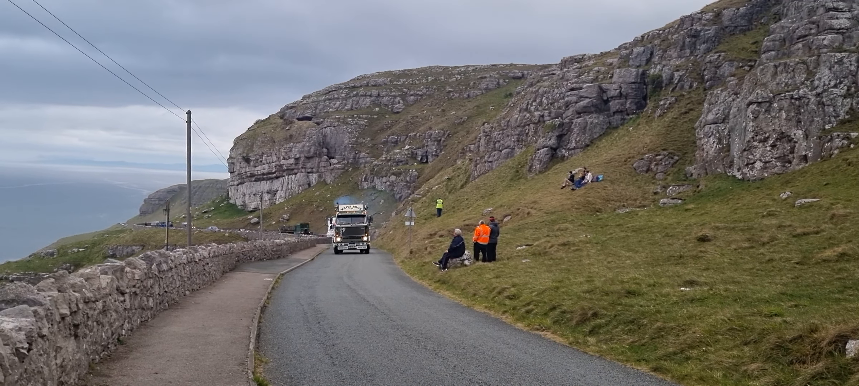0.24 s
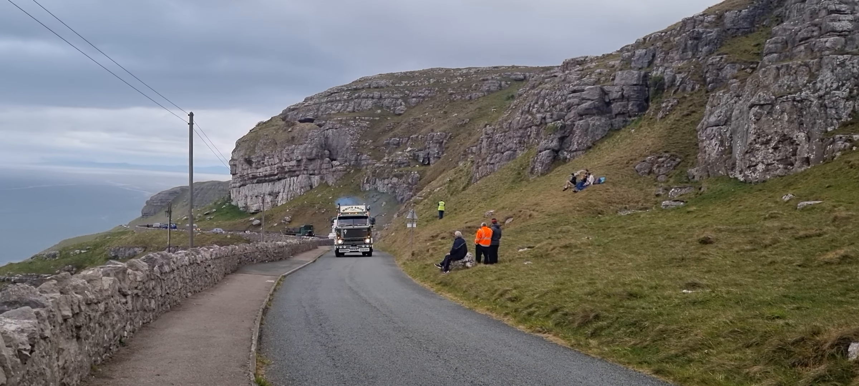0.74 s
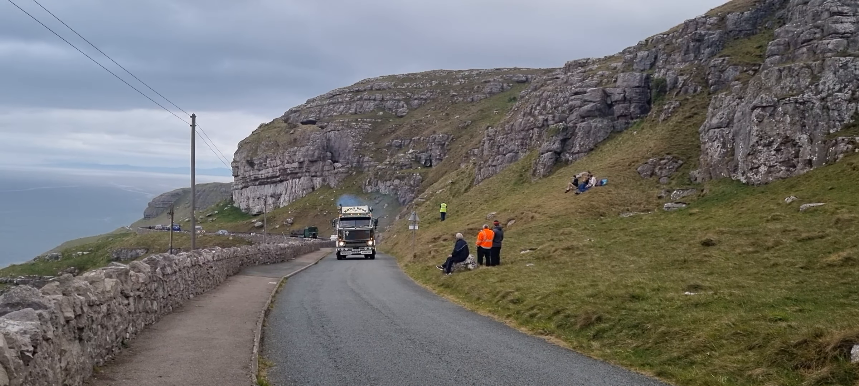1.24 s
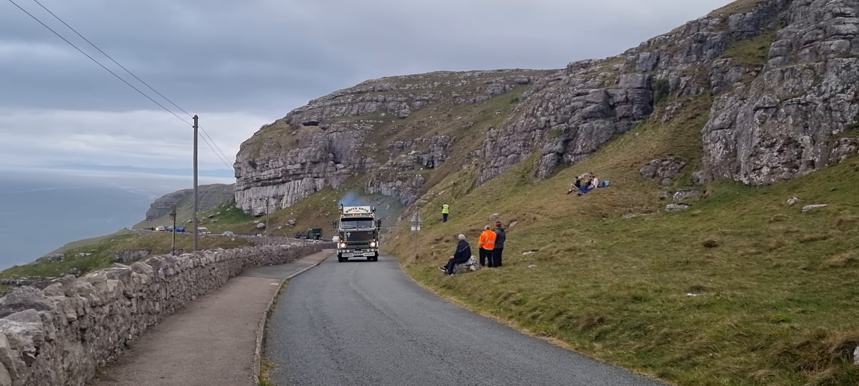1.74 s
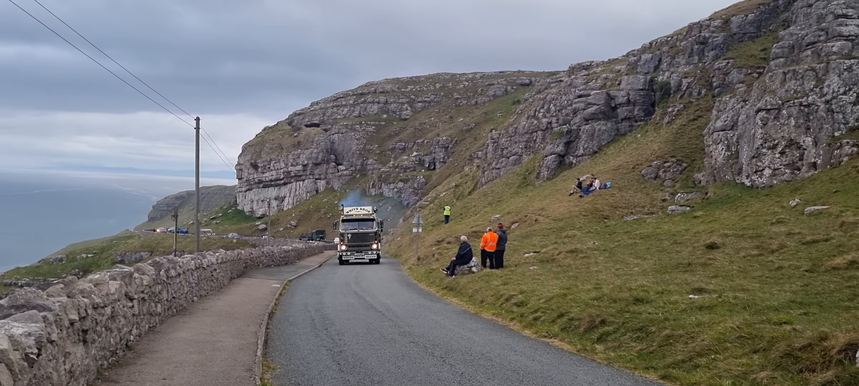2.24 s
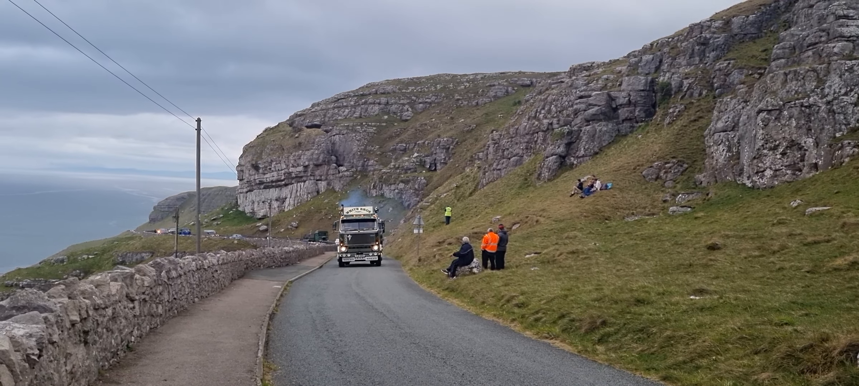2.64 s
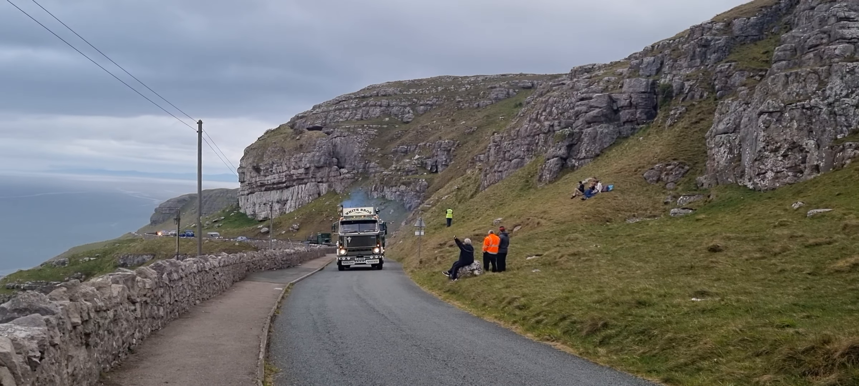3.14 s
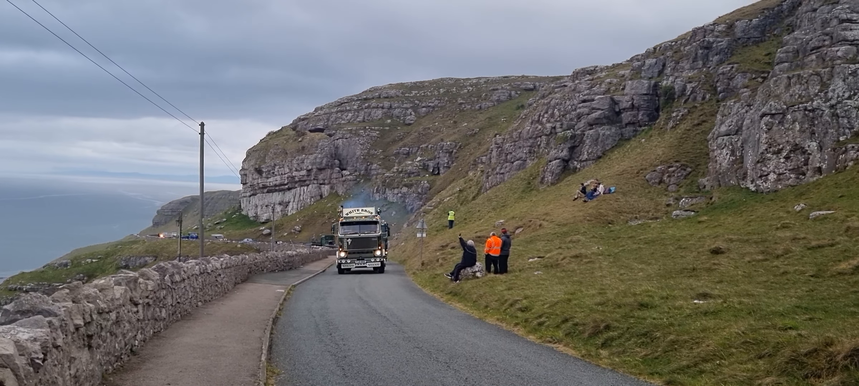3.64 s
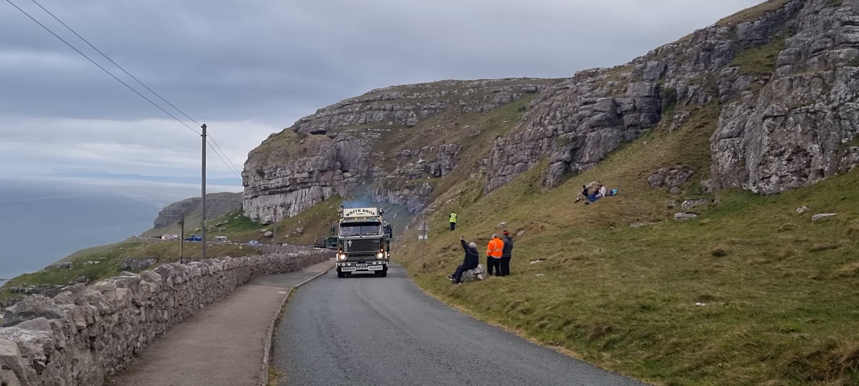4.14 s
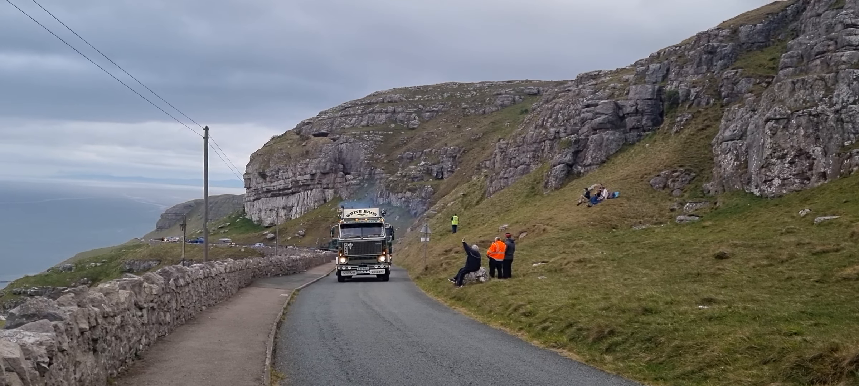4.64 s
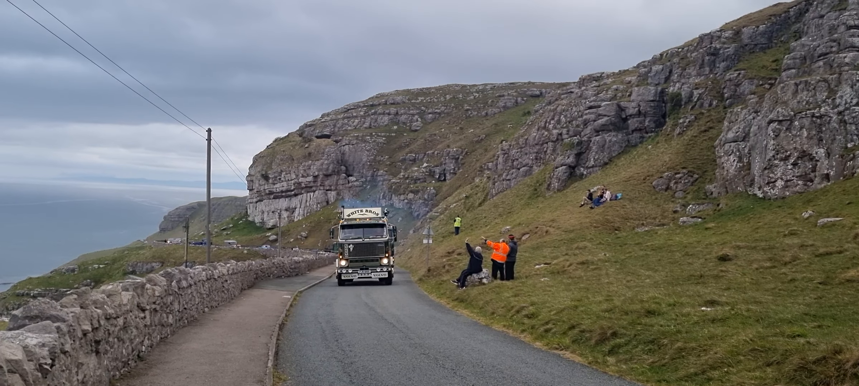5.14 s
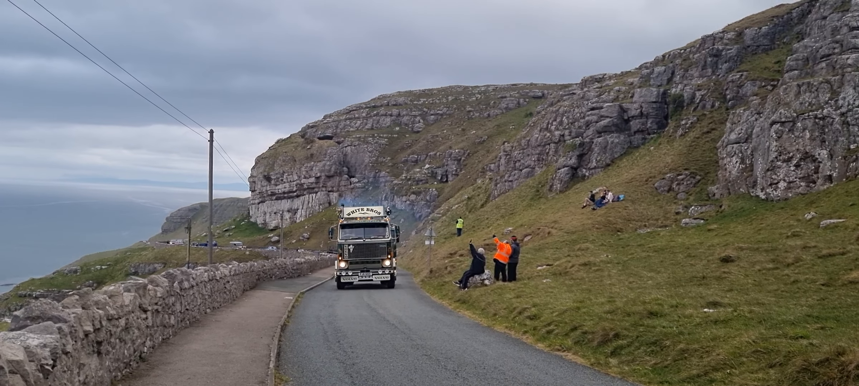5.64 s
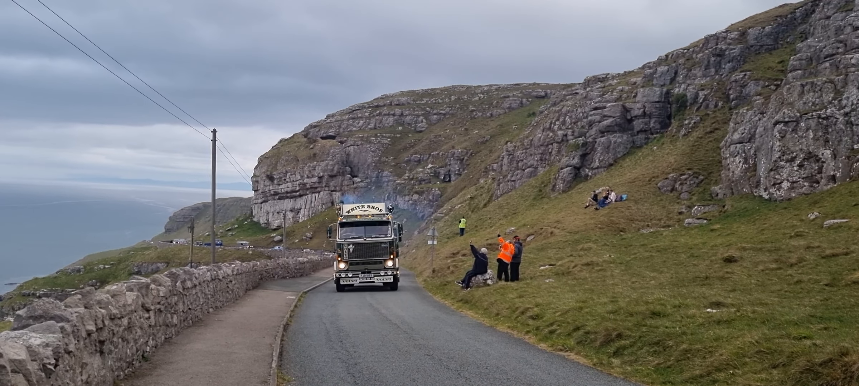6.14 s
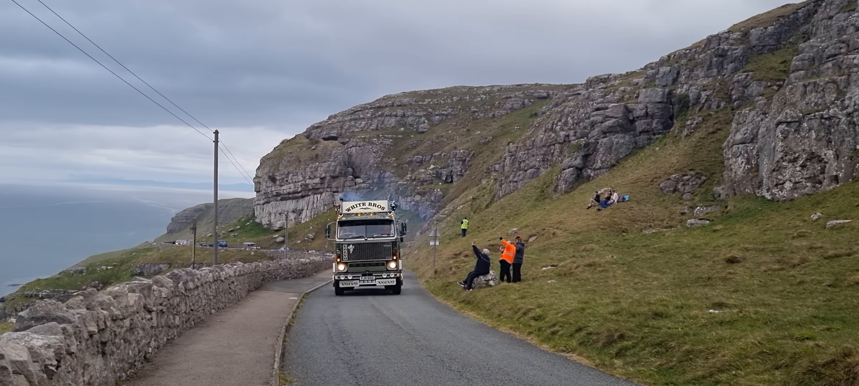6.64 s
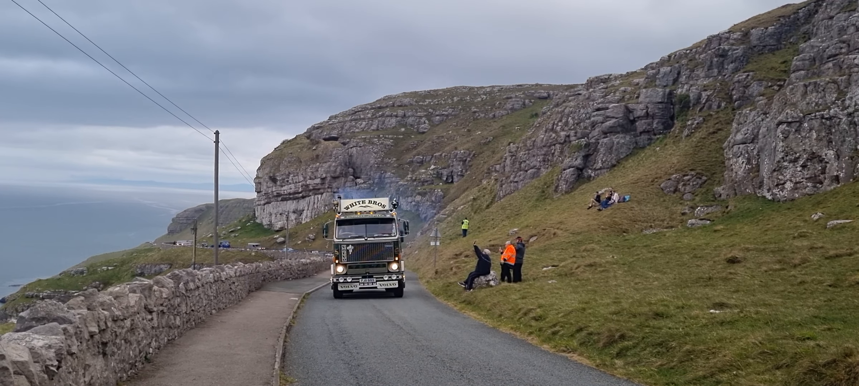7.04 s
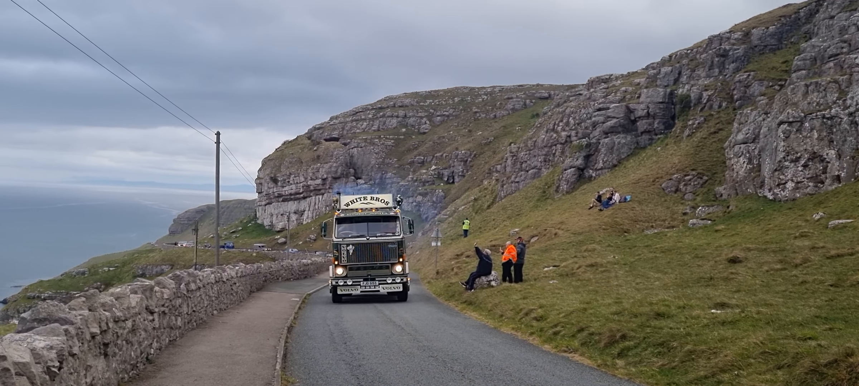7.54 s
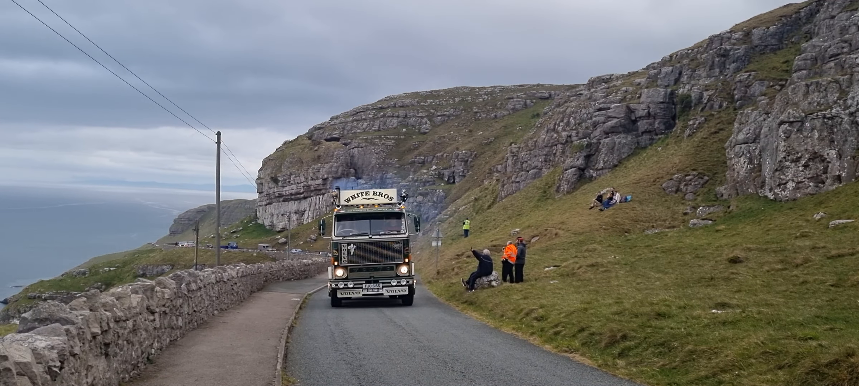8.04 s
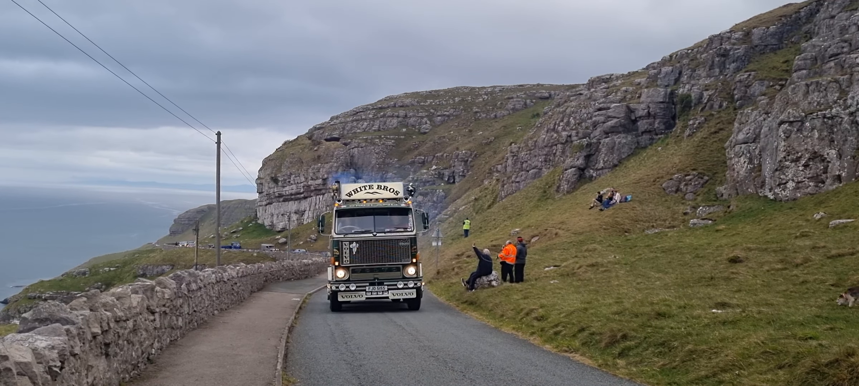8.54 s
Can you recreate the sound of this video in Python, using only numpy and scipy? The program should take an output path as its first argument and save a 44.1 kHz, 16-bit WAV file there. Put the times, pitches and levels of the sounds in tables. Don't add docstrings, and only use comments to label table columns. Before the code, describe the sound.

Steady diesel engine rumble and clatter approach outdoors; a loud sustained truck horn echoes off rock, followed by two quick lower honks.

```python
import sys
import numpy as np
from scipy import signal
from scipy.fft import rfft, irfft, next_fast_len
from scipy.io import wavfile
from scipy.ndimage import uniform_filter1d

SR = 44100
rng = np.random.default_rng(int(sys.argv[2]) if len(sys.argv) > 2 else 0)


def master_out(mix):
    frames = np.transpose(np.atleast_2d(mix))
    ceiling = np.clip(frames, -1, 1)
    pcm = np.round(ceiling * 32767).astype(np.int16)
    wavfile.write(sys.argv[1], SR, pcm)


def volts_from_db(level):
    exponent = np.asarray(level, float) / 20
    return 10 ** exponent


N = 387638


def in_time(rows, t):
    s, *columns = np.transpose(rows)
    return [np.interp(t, s, c) for c in columns]


def at_hz(points, hz, column=1):
    p = np.array(points, float)
    return np.interp(np.log(hz + 1), np.log(p[:, 0] + 1), p[:, column])


def filtered(x, order, hz, kind="low"):
    return signal.sosfilt(signal.butter(order, hz, kind, fs=SR, output="sos"), x)


def rms_one(x):
    return x / np.sqrt(np.mean(x ** 2) + 1e-20)


def drift(rate):
    r = np.exp(-80 * np.pi * rate / SR)
    slow = signal.lfilter([1], [1, -2 * r, r * r], rng.standard_normal(N // 40 + 2002))[2000:]
    return np.interp(np.arange(N) / 40, np.arange(len(slow)), rms_one(slow))


def placed(x, start_s):
    out, at = np.zeros((2, N)), int(start_s * SR)
    out[:, at:at + x.shape[1]] = x
    return out


def port_lead(ports, hz):
    return np.exp(1j * np.interp(hz, *np.transpose(ports)))


# pitch_hz, lead_radians
ROAD_LEAD = [(0, 0.34), (430, 0.87), (690, 2.45), (2840, 2.13), (3450, 8.4), (3880, 1.93), (4220, 9),
             (4910, 10.5), (5770, 10.2), (6890, 11.7), (10200, 21), (10600, 12), (12700, 30), (15500, 23.5)]
# pitch_hz, difference_db
ROAD_TILT = [(60, 0), (110, -0.5), (200, 2.5), (380, -4.5), (700, -1), (1290, 1), (2380, -8.5), (4400, -3),
             (8120, 19), (15000, -5.5)]
# pitch_hz, share (0 to 1)
UNRELATED = [(40, 0.67), (200, 0.23), (700, 0.75), (3000, 0.83), (12000, 0.92)]


def at_ports(source, spectrum):
    size = 2 * next_fast_len(N // 2 + 1)
    hz = np.arange(size // 2 + 1) * SR / size
    direct, diffuse = rfft(source, size) * volts_from_db(at_hz(spectrum, hz)) * (hz < spectrum[-1][0])
    share = np.clip(at_hz(UNRELATED, hz), 0, 1)
    tilt = volts_from_db(at_hz(ROAD_TILT, hz) / 2)
    left = np.sqrt(1 - share ** 2) * direct * port_lead(ROAD_LEAD, hz) + share * diffuse
    out = irfft([left * tilt, direct / tilt], size)[:, :N]
    return out / np.std(out.mean(axis=0))


BLAST_DUCK_DB, TOOT_DUCK_DB, RECOVER_S = -4.5, -0.5, 0.36


def ducking():
    t = np.arange(N) / SR
    spans = [(4.05, 5.0, BLAST_DUCK_DB), (7.47, 7.6, TOOT_DUCK_DB), (7.71, 7.88, TOOT_DUCK_DB)]
    return volts_from_db(sum(db * (t > on) * np.exp(-np.maximum(t - off, 0) / RECOVER_S) for on, off, db in spans))


# time_s, pitch_hz, level_db
DRONE_TONE = [(0.0, 54.76, -28), (0.73, 49.1, -32), (2.5, 49.1, -31), (2.67, 48.1, -37.5),
              (2.94, 47.44, -26.5), (3.72, 56.2, -30), (3.99, 56, -27.5), (4.09, 48.9, -42),
              (4.36, 49.6, -39), (4.48, 57.1, -57), (4.77, 51.1, -49), (5.53, 57.33, -27.5),
              (6.41, 62.15, -40.5), (7.2, 57.5, -48), (7.32, 58, -32), (7.54, 50.9, -57),
              (7.91, 50.25, -41), (8.79, 57.2, -32)]
# pitch_hz, level_db (per Hz)
RUMBLE_COLOUR = [(18, -37.5), (30, -12.5), (40, -4.5), (52, -7), (75, -3), (91, -3), (105, -17), (119, -18),
                 (135, -15), (180, -45), (300, -120)]
RUMBLE_DB, RUMBLE_FADE_DB, RUMBLE_FADE_S = -41.5, 12, 2.97


def drone():
    t = np.arange(N) / SR
    pitch_hz, tone_db = in_time(DRONE_TONE, t)
    cycles = np.cumsum(pitch_hz + 0.73 * drift(3.1)) / SR
    tone = np.sin(2 * np.pi * cycles) * volts_from_db(tone_db + 2.5 + 1.7 * drift(9.4))
    rumble_db = RUMBLE_DB + RUMBLE_FADE_DB * np.exp(-t / RUMBLE_FADE_S) + 1.6 * drift(4.5)
    rumble = at_ports(rng.standard_normal((2, N)), RUMBLE_COLOUR)
    return tone + volts_from_db(rumble_db + 3) * ducking() ** 0.53 * rumble


# time_s, level_db
EFFORT = [
    (0, 0.2),
    (1.5, -.5),
    (3, 0.94),
    (4, 2),
    (5.25, -2),
    (6, -2.5),
    (7, 1),
    (7.4, 3),
    (8, 5),
    (8.79, 4.5),
]
# time_s, share of the usual cycle rate
ENGINE_SPEED = [(0, .97), (1.2, .985), (3.8, 1.0), (5.4, 1.0), (7.9, 1.0), (8.4, .995), (8.79, .97)]
# multiple_of_cycle, level_db
FIRING_TONES = [(6, -10.5), (12, 2), (18, -2), (20, -5), (32, -16.5), (42, -12), (63, -32.5), (88, -23.5),
                (120, -17)]
# pitch_hz, level_db (per Hz)
ROAR_COLOUR = [(74, -29), (125, -1), (145, -17), (156, -7), (178, -3.5), (221, -10), (303, -14), (370, -16),
               (409, -11), (620, -17.5), (810, -54), (1360, -120)]
CLATTER_COLOUR = [(340, -11), (580, -10.5), (628, -5.5), (680, -11), (837, 0.5), (933, -5.5), (1150, 1),
                  (1310, -7), (1710, -9.5), (2020, -15.5), (3220, -15), (3930, -24.5), (4610, -31.5),
                  (5030, -31), (6200, -47), (8060, -53), (13600, -120)]
HISS_COLOUR = [(3410, -40.5), (5800, -5), (6330, -17), (7740, -15), (9120, -28), (10000, -2.5), (11200, -2),
               (12000, 6), (14100, 0.5), (15100, -6), (15800, -7)]
CYCLE_HZ, TICK_S = 9.715, 5.389
ROAR_DB, CLATTER_DB, HISS_DB, TONES_DB = -40.5, -43.5, -86, -39
ROAR_FOLLOWS, HISS_FOLLOWS, TONES_FOLLOWS = 0.71, .9, 0.79
LEAVING_S, LEAVING_ROAR_DB, LEAVING_CLATTER_DB, LEAVING_HISS_DB = 0.94, 7, 1.5, 9
EMERGE_S, HIDDEN_DB = 1.97, -8
CLEAR_S, CLEAR_HISS_DB = (4.7, 6.44), 12.5
TONE_WAVER_DB = 1.3


def lorry():
    t = np.arange(N) / SR
    effort_db, = in_time(EFFORT, t)
    leaving = np.exp(-t / LEAVING_S)
    clearing_db = np.interp(t, CLEAR_S, (0, CLEAR_HISS_DB))
    roar_db = ROAR_DB + ROAR_FOLLOWS * effort_db + LEAVING_ROAR_DB * leaving
    clatter_db = CLATTER_DB + effort_db + LEAVING_CLATTER_DB * leaving
    hiss_db = HISS_DB + HISS_FOLLOWS * effort_db + LEAVING_HISS_DB * leaving + clearing_db
    tone_db = TONES_DB + TONES_FOLLOWS * effort_db + HIDDEN_DB * np.exp(-t / EMERGE_S)

    cycle = np.cumsum(in_time(ENGINE_SPEED, t)[0]) * CYCLE_HZ / SR
    cycle -= np.interp(TICK_S, t, cycle)
    firing = 1 + 0.13 * np.cos(12 * np.pi * cycle) + 0.022 * np.cos(4 * np.pi * cycle)
    tick = 1 + 1.1 * volts_from_db(3 * drift(4)) * np.exp(-(cycle % 1) / 0.086) * (t > 5)

    noise = rng.standard_normal((3, 2, N))
    roar = volts_from_db(roar_db - 0.5 + 1.6 * drift(2.9)) * at_ports(noise[0] * firing, ROAR_COLOUR)
    clatter = volts_from_db(clatter_db + 0.81 * drift(6.6)) * at_ports(noise[1] * firing, CLATTER_COLOUR)
    hiss = volts_from_db(hiss_db + 1.1 * drift(20)) * at_ports(noise[2] * firing * tick, HISS_COLOUR)
    wobble = cycle + 0.0013 * drift(0.7)
    tones = np.zeros(N)
    for k, db in FIRING_TONES:
        tones += volts_from_db(db + TONE_WAVER_DB * drift(0.86)) * np.sin(2 * np.pi * k * wobble + k)
    return roar + clatter + hiss + volts_from_db(tone_db + 2.0) * tones


# time_s, peak_db
GRIT_CLICKS = [(0.2573, -60), (0.4923, -58), (0.8294, -57), (1.955, -65), (2.4997, -68), (2.9476, -63),
               (3.2261, -68.5), (3.7249, -64)]
# time_s, peak_db
PANEL_KNOCKS = [
    (1.952, -22),
    (8.386, -19),
    (8.495, -21),
    (8.595, -17),
]


def grit():
    out, t = np.zeros((2, 2, N)), np.arange(800) / SR
    for layer, events, decay_s in zip(out, (GRIT_CLICKS, PANEL_KNOCKS), (.002, .005)):
        for s, db in events:
            at = int(s * SR)
            layer[:, at:at + 800] += volts_from_db(db) * rng.standard_normal((2, 800)) * np.exp(-t / decay_s)
    clicks = filtered(out[0], 2, 4000, "high")
    knocks = filtered(out[1], 3, [800, 1900], "band")
    return clicks + 0.6 * knocks


def scatter(db, t60, rise_s):
    t = np.arange(SR) / SR
    reply = rng.standard_normal((2, SR)) * volts_from_db(-60 * t / t60) * np.clip(t / rise_s, 0, 1)
    return reply * volts_from_db(db) / np.sqrt(np.sum(reply[0] ** 2))


# delay_s, level_db
ROCK_ECHOES = [
    (.045, -24.5),
    (.085, -23),
    (.16, -23.5),
]
TAIL_DB, TAIL_T60_S, ECHO_CUT_HZ = -23, 1.6, 1200
NEAR_DB, NEAR_T60_S, NEAR_CUT_HZ = -18.5, 0.46, 4700
ECHO_LOW_HZ = 221


def rock_face(x):
    reply = scatter(TAIL_DB, TAIL_T60_S, rise_s=0.037)
    for delay, db in ROCK_ECHOES:
        reply[:, int(delay * SR)] += volts_from_db(db)
    reply = filtered(reply, 3, ECHO_CUT_HZ)
    reply += filtered(scatter(NEAR_DB, NEAR_T60_S, rise_s=0.0036), 2, NEAR_CUT_HZ)
    reply = filtered(reply, 1, ECHO_LOW_HZ, "high")
    start = 4 * SR
    return placed(signal.fftconvolve(x[:, start:], reply, axes=1)[:, :N - start], 4)


WARM_DULL_DB, WARM_S = 0.06, 0.025
RING_ONSET_S = 0.013


def valve(t, opens, shut, attack_s, free_s, free_dull_db, bloom_s, surge_db, settle_s, start_sharp,
          hold_dull_db, close_s, close_db, close_dull_db, end_sharp, ring_dull_db, ring_db_per_s):
    beating = np.maximum(t - opens - free_s, 0)
    after = np.maximum(t - shut, 0)
    closing = np.clip(1 + (t - shut) / close_s, 0, 1)
    settling = np.exp(-beating / settle_s)
    ringing = 1 - np.exp(-after / RING_ONSET_S)
    level_db = surge_db * settling - close_db * closing ** 2 - ring_db_per_s * after
    gain = np.clip((t - opens) / attack_s, 0, 1) * volts_from_db(level_db)
    sharp = start_sharp * settling + end_sharp * closing ** 2 * (1 - 0.74 * ringing)
    dull_db = hold_dull_db + WARM_DULL_DB * np.exp(-beating / WARM_S)
    dull_db = dull_db + free_dull_db * np.exp(-beating / bloom_s)
    dull_db = dull_db + close_dull_db * closing + ring_dull_db * ringing
    return gain, sharp, dull_db


PUFF_DB, PUFF_S, PUFF_LEAD_S, PUFF_CUT_HZ = 6.5, 0.018, .001, (1400, 6800)


def puff(t, opens):
    since = t - opens + PUFF_LEAD_S
    hiss = filtered(rng.standard_normal(len(t)), 1, PUFF_CUT_HZ, "band")
    return volts_from_db(PUFF_DB) * np.clip(since / .002, 0, 1) * np.exp(-np.maximum(since, 0) / PUFF_S) * hiss


SHIMMER_DB, SHIMMER_PER_S = 5.5, 6.1


def wander_gain(spread):
    return (1 + SHIMMER_DB * spread * np.log(10) / 40) ** 2


BREATH_DB, BREATH_GATE, BREATH_CUT_HZ = -17, 0.6, 3000


def reed(cycles, dull_db, count):
    dull_db = np.maximum(dull_db, 0)
    turn = np.exp(2j * np.pi * cycles)
    partial, out = turn.copy(), np.zeros(len(cycles))
    step = turn * volts_from_db(-dull_db)
    knots = np.arange(len(cycles)) / SR * SHIMMER_PER_S
    eddies = rng.standard_normal((count, 20))
    for k in range(count):
        if k % 3 == 0:
            wander = wander_gain(np.interp(knots, np.arange(20), eddies[k] * k / count))
        out -= wander * partial.real
        partial = partial * step
    breath = rng.standard_normal(len(cycles)) * (1 - BREATH_GATE * turn.real)
    breath = filtered(breath, 1, BREATH_CUT_HZ, "high")
    return out + volts_from_db(BREATH_DB - 7.0 * dull_db) * np.sqrt(count) * breath


def causal_phase(db):
    cepstrum = irfft(db * np.log(10) / 20)
    half = len(cepstrum) // 2
    cepstrum[1:half] *= 2
    cepstrum[half + 1:] = 0
    return rfft(cepstrum).imag


def bell(pulses, table, pitch_hz, columns, ports, causal=1, lead=((1, 0, 0),)):
    size = 2 * next_fast_len(len(pulses) // 2 + 4096)
    order = np.arange(size // 2 + 1) * SR / size / pitch_hz
    left_db, right_db = (at_hz(table, order, column=c) - 30 * np.clip(1 - order, 0, 1) for c in columns)
    body = causal * causal_phase(at_hz(table, order, column=2))
    rows = 2.56 * rng.standard_normal((2, 200)) * (np.arange(200) > 40)
    uneven_db = [np.interp(order, np.arange(200), row) for row in rows]
    left = volts_from_db(left_db + uneven_db[0]) * port_lead(ports, order * pitch_hz)
    left = left * np.exp(1j * at_hz(lead, order))
    right = volts_from_db(right_db + uneven_db[1]) * np.exp(1j * at_hz(lead, order, column=2))
    return irfft(rfft(pulses, size) * np.exp(1j * body) * [left, right], size)[:, :len(pulses)]


FOURTH_BELOW_DB = 7


def deep_reed(cycles, dull_db, third_db):
    third = (volts_from_db(third_db) - 1) * np.cos(6 * np.pi * cycles)
    fourth = (volts_from_db(third_db - FOURTH_BELOW_DB) - 1) * np.cos(8 * np.pi * cycles)
    plain = reed(cycles, dull_db, count=126)
    return plain, plain - .9 * (third + fourth) * volts_from_db(1.2 - dull_db)


# multiple_of_pitch, left_db, right_db
DEEP_COLOUR = [(1.001, -27, -28), (2, -36, -40), (3, -31.5, -32), (4.02, -31.5, -29), (5, -31, -26),
               (6, -23.5, -31), (7, -30, -46), (7.9, -28, -28), (9.1, -25.5, -23), (10, -21.5, -23.5),
               (10.9, -21.5, -25), (11.8, -26, -35), (13.4, -30, -24.5), (13.8, -45, -32),
               (15.3, -34, -24.5), (16, -36, -30), (17.2, -44, -30.5), (18, -32, -28), (19, -40, -31),
               (20.1, -37, -38), (21, -33, -38), (22.4, -33, -31), (23, -33, -38), (23.5, -40, -29),
               (24.8, -40, -26.5), (26, -33, -24.5), (27.3, -45, -23.5), (28, -39, -32), (29.3, -40, -32),
               (30.2, -41, -37), (31, -50, -48), (31.8, -44, -39), (33, -46, -40), (34, -40, -44),
               (34.6, -48, -42), (36, -41, -38), (36.8, -45, -43), (38, -44, -48), (39, -41, -47),
               (40, -41, -47),
               (41.7, -39, -45), (54.7, -47.5, -68.5), (69.5, -51, -73), (82.6, -49.5, -62),
                   (97, -46, -42), (116, -48, -54)]
# pitch_hz, lead_radians
DEEP_LEAD = [(0, -1), (123, 0.44), (246, 0.35), (369, 0.74), (492, 1), (615, 2.1), (738, 3.5), (861, 1),
             (984, 1.2), (1107, 1.86), (1230, 2.14), (1353, 1.8), (1476, 1.4), (1599, 2.1), (1722, 1),
             (1845, 4), (1968, 1.5), (2091, 4), (2214, 3), (2337, 5.5), (2460, 6.5), (2583, 3.5),
             (2706, 2.3), (2829, 3.5), (2952, 4), (3075, 4.75), (3198, 4), (3321, 1.5), (3444, 6.5),
             (3567, 7.72), (3690, 8), (3813, 13), (3936, 7.5), (5340, 16), (6370, 17.5), (7490, 44.5),
             (9040, 46.6), (9990, 55.5), (11300, 60), (12700, 50.1), (15500, 56)]
DEEP_REED = dict(attack_s=.01, free_s=0.0092, free_dull_db=2.4, bloom_s=0.0047, surge_db=-4.5,
                 settle_s=0.035, start_sharp=0.85, hold_dull_db=0.36, close_s=0.017, close_db=4,
                 close_dull_db=0, end_sharp=2.77, ring_dull_db=0.3, ring_db_per_s=330)
TOOT_HZ, PARTNER_DB, TOOT_PUFF_DB = 122.9, -2.2, -18
LAG_CYCLES_PER_S, PARTNER_PORT_CYCLES, CATCH_UP_CYCLES = 0.32, 0.0058, 0.036
WALL_S, WALL_HZ, WALL_DB = .062, (407, 556), -3
DEEP_CAUSAL = .95


def toot(opens, shut, level_db, lag, third_db):
    t = opens - .02 + np.arange(int(.33 * SR)) / SR
    gain, sharp, dull_db = valve(t, opens, shut, **DEEP_REED)
    cycles = TOOT_HZ * np.cumsum(1 + sharp / 100) / SR
    gain = gain * volts_from_db(level_db + 2)
    plain, shaped = gain * deep_reed(cycles, dull_db, third_db)
    first = shaped + volts_from_db(TOOT_PUFF_DB) * puff(t, opens - .008)
    catch_up = np.interp(t - shut, (-.022, -.006), (0, CATCH_UP_CYCLES))
    behind = lag + LAG_CYCLES_PER_S * (t - opens) - catch_up
    partner = gain * volts_from_db(PARTNER_DB) * deep_reed(cycles - behind, dull_db, third_db)[1]
    wall = np.roll(filtered(plain, 2, WALL_HZ, "band"), int(WALL_S * SR))

    colour = DEEP_COLOUR
    out = bell(first + volts_from_db(WALL_DB) * wall, colour, TOOT_HZ, (1, 2), DEEP_LEAD, DEEP_CAUSAL)
    across = [(hz, lead - 2 * np.pi * hz / TOOT_HZ * PARTNER_PORT_CYCLES) for hz, lead in DEEP_LEAD]
    return placed(-out - bell(partner, colour, TOOT_HZ, (1, 2), across, DEEP_CAUSAL), t[0])


# opens_s, shut_s, level_db, partner_lag_cycles, third_partial_db
TWO_TOOTS = [
    (7.448, 7.586, 2, 0.069, 8.5),
    (7.696, 7.877, 2, 0.08, 0.5),
]


def toots():
    return sum(toot(*row) for row in TWO_TOOTS)


# multiple_of_pitch, first_left_db, first_right_db,
# second_left_db, second_right_db
BLAST_COLOUR = [(1, -19.5, -20, -20, -20.5), (2, -17, -15.5, -24.5, -23.5), (2.99, -37.5, -34, -37, -32.5),
                (4, -36, -33.5, -44.5, -39), (5.02, -33.5, -38, -28, -30.5), (6.09, -20.5, -21, -23.5, -25),
                (7, -18, -22.5, -23, -23), (7.97, -19, -23.5, -24, -28.5), (9.1, -20, -23, -26.5, -28.0),
                (10.1, -23.5, -17.0, -23.5, -21.5), (10.92, -19, -15.5, -31.5, -24.5),
                (11.9, -36.5, -27.5, -45.5, -35), (12.4, -27.5, -25.5, -33.5, -22.5),
                (13.87, -29.5, -35.5, -31.5, -26.5), (14.8, -27, -33, -28, -39),
                (16.4, -40.5, -23, -36.5, -30.5), (17.5, -28, -27.5, -34, -26),
                (18.04, -34, -21.5, -45.5, -27), (18.87, -37, -19.5, -46, -26.5),
                (20.1, -47, -33, -42, -37.5), (21, -31.5, -26.5, -37.5, -29),
                (22, -39, -27.5, -46.5, -36.5), (22.8, -43.5, -44, -37, -29), (24.14, -33, -41, -39, -45),
                (25.3, -32, -29, -31.5, -35.5), (26, -32.5, -31.5, -34.5, -33.5),
                (26.4, -39, -38, -41, -47.0), (28, -39.5, -39, -43.5, -40), (28.7, -43, -35.5, -39, -42.5),
                (29.3, -46.5, -43, -44.5, -41.5), (31, -44, -43, -39, -46), (32, -38, -38.5, -36, -45.5),
                (32.8, -32, -44, -40.5, -47), (33.8, -43.5, -53.5, -35.5, -45),
                (34.9, -37, -46, -40.5, -54), (36.2, -41.5, -47, -44.5, -58.5),
                (37, -44.5, -61, -46, -68.0), (38.1, -42.5, -62, -43.5, -66), (39, -41.5, -57, -44, -54.5),
                (39, -37.5, -56.5, -37.5, -49.5),
                (44, -47, -69, -52, -62), (48.3, -44.5, -58.5, -37.5, -61),
                    (50, -42.5, -54.5, -42, -58), (56, -54.5, -54.5, -48.5, -59),
                    (58.7, -39.5, -50.5, -36.5, -56.5), (64, -40.5, -46.5, -41, -43.5),
                    (70.2, -41.5, -38.5, -39.5, -29), (71, -45, -33.5, -39.5, -34),
                    (74.7, -32, -33.5, -43, -39), (80, -40, -41, -41.5, -35), (84, -36, -41, -39, -41),
                    (88, -33.5, -43.5, -37, -48.5), (92, -41, -59, -42.5, -57)]
# pitch_hz, lead_radians
BLAST_LEAD = [(0, 1.5), (168, 0.33), (336, 0.63), (503, 1.1), (671, 2), (839, -0.6), (1007, 1.56),
              (1175, 1.83), (1342, 1.52), (1510, 1.4), (1678, 2.03), (1846, 1.74), (2014, 1.9), (2181, 1.5),
              (2349, 4), (2517, 4), (2685, 2.5), (2853, 6.5), (3020, 3.5), (3188, 5), (3356, 3),
              (3524, 9.5), (3692, 5.5), (3859, 9.5), (4027, 7), (4195, 8), (4363, 9.5), (4531, 10.5),
              (4698, 10), (4866, 10.5), (5034, 13.5), (5202, 16.5), (5370, 17), (7060, 18), (8100, 26.5),
              (9990, 35), (15500, 55.5)]
SECOND_LEAD = [(1.01, -0.02, -0.04), (2, 0.7, 0.72), (3.02, -0.7, 0), (4, -1.5, -2.01), (5, 0.75, -1.5),
               (6.03, -0.7, -0.8), (7, 0.25, -0.2), (8.9, -0.55, -0.2), (12, -.6, 0.1), (13, 2.7, 0.9),
               (14, 0, 0), (15.6, -.1, -1.5), (17, -0.5, 2.6), (18, -2.5, 0.5), (18.8, -5, -.1),
               (21.1, -0.7, 1.3), (23.95, -0.9, -0.2), (27.9, -0.4, -1.3), (32, -1, -0.5), (40, -2, -1.9),
               (70, 1.3, 3)]
LONG_REED = dict(attack_s=.005, free_s=.0155, free_dull_db=2.2, bloom_s=.0006, surge_db=4.0,
                 settle_s=.014, start_sharp=5.0, hold_dull_db=.045, close_s=.04, close_db=3.0,
                 close_dull_db=.06, end_sharp=4.0, ring_dull_db=3.0, ring_db_per_s=300)
BLAST_HZ, TOGETHER_S = (167.835, 168.825), 4.63
OPENS_S, SHUT_S = 4.038, 4.993
SECOND_JOINS_S = (4.056, 4.105)


def blast():
    t = 4 + np.arange(int(1.12 * SR)) / SR
    gain, sharp, dull_db = valve(t, OPENS_S, SHUT_S, **LONG_REED)
    bent = np.cumsum(1 + sharp / 100 + 0.00052 * drift(18)[:len(t)]) / SR
    bent -= np.interp(TOGETHER_S, t, bent) - .0022
    first = reed(BLAST_HZ[0] * bent, dull_db, count=92)
    second = reed(BLAST_HZ[1] * bent, dull_db, count=92)
    gain = gain * volts_from_db(.5 * drift(1.1)[:len(t)])
    first = gain * first + puff(t, OPENS_S)
    second = gain * np.interp(t, SECOND_JOINS_S, (0, 1)) * second

    colour = BLAST_COLOUR
    out = bell(first, colour, BLAST_HZ[0], (1, 2), BLAST_LEAD)
    out = out + bell(second, colour, BLAST_HZ[1], (3, 4), BLAST_LEAD, lead=SECOND_LEAD)
    return placed(out, 4)


TOOT_WET_DB = 6


def scene():
    long, short = blast(), toots()
    echoes = rock_face(long + volts_from_db(TOOT_WET_DB) * short)
    background = uniform_filter1d(ducking(), size=400) * lorry() + drone() + grit()
    return long + short + echoes + background


def top_cut(x):
    return signal.sosfilt(signal.butter(12, 15940, fs=SR, output="sos"), x)


def record(dry):
    cut = filtered(dry, 3, 32, "high")
    rounded = .94 * cut / (1 + np.abs(cut) ** 6) ** (1 / 6)
    mix = signal.sosfilt(signal.cheby2(16, 60, 16050, fs=SR, output="sos"), rounded)
    return top_cut(mix)


dry = scene()
out = record(dry)
master_out(out)
```